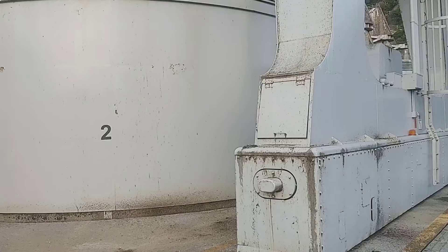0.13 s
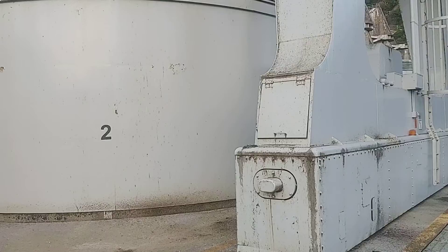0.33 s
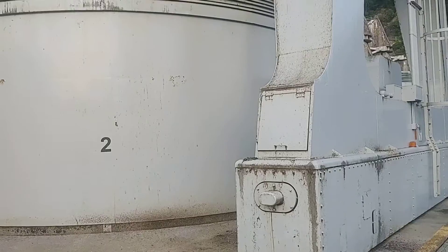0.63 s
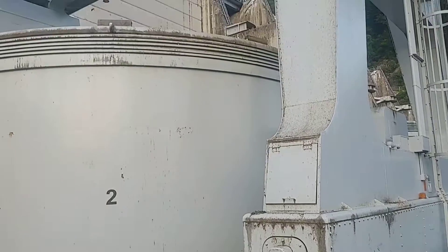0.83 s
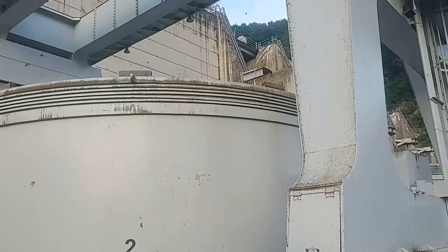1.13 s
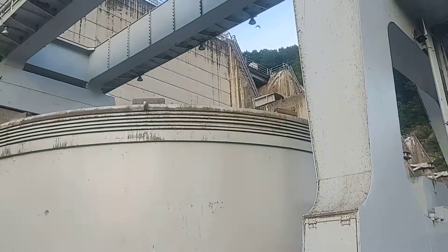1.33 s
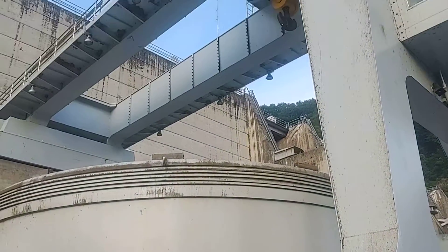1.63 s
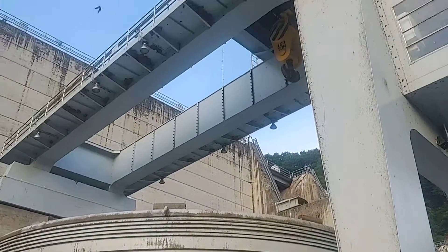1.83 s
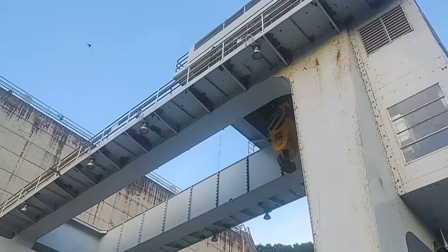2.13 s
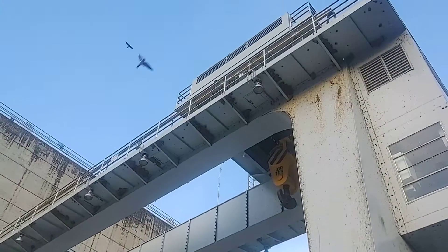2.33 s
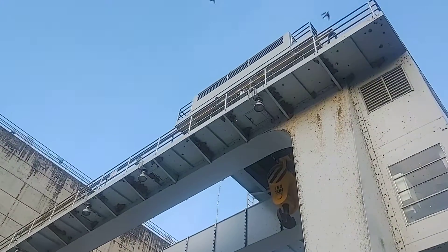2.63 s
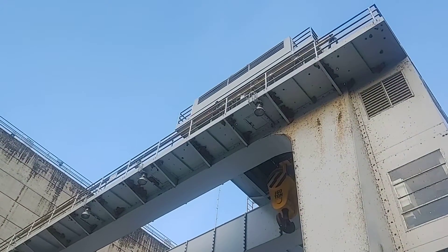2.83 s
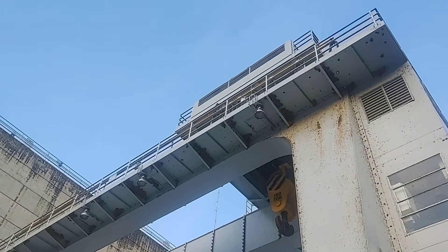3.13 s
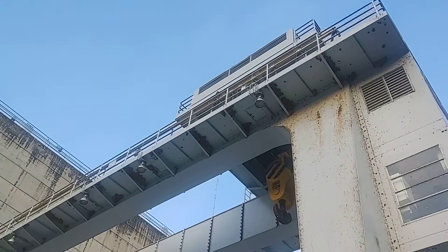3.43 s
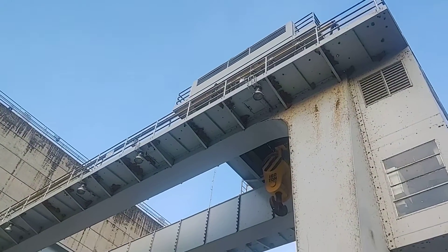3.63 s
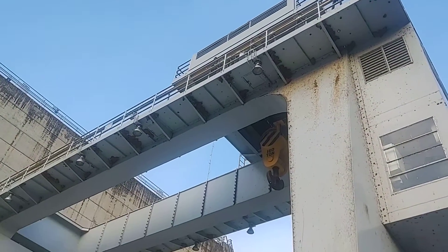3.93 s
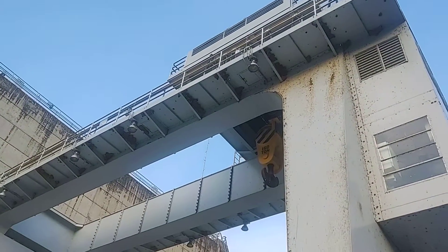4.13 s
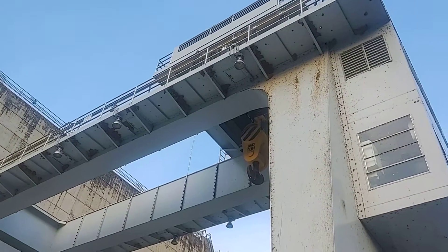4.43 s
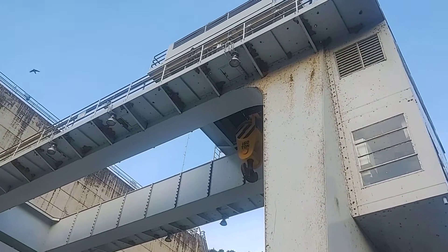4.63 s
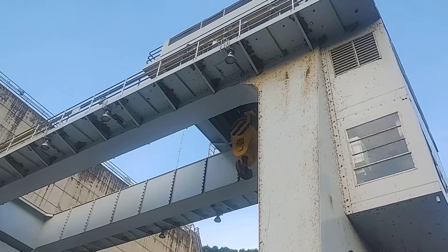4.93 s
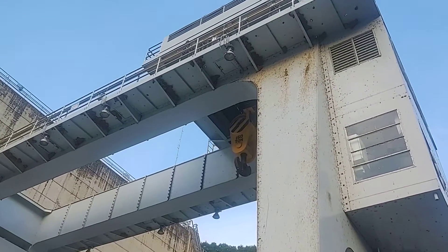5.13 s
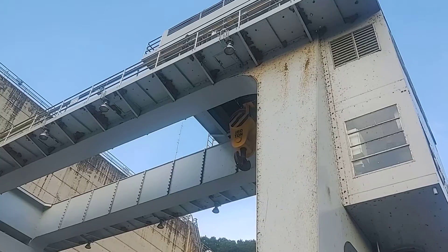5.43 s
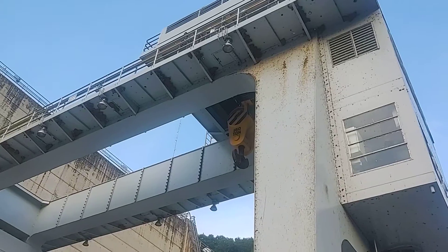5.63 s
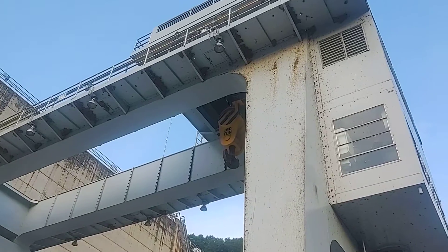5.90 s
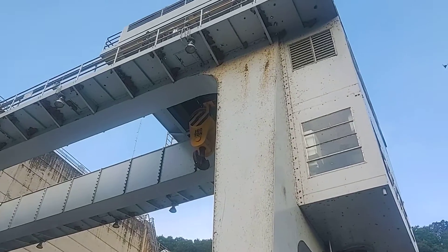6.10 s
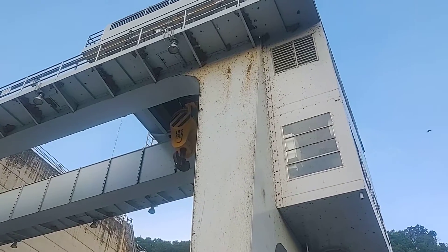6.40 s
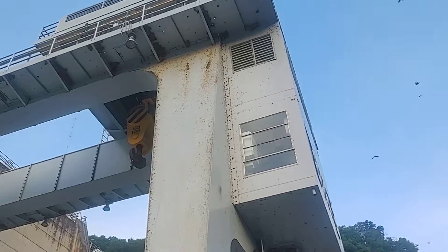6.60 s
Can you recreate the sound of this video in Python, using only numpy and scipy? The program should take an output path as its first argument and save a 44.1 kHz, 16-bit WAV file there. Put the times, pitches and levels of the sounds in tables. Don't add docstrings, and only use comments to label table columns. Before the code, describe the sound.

The first 0.3 seconds are silent; then sound snaps open, swells too loud with a boxy boom, and settles by about 1 second. A deep steady generator hum, slightly pulsing, continues to the end with muffled fan and water wash and a faint mid-high whine strongest around 2.5 seconds. From 0.3 to 1.3 seconds small birds call densely: a loud tumbling chirp, hoarse descending churrs, chips and thin whistles. More chips and rasps cluster at 1.5-2 and 2.4-2.9 seconds, ending in a soft pair. From 3 to 4 seconds only faint distant chips. A loud raspy pair comes at 4.15 left, two buzzy rapid twitters at 4.8 and 5.0, a churr at 5.4 with a tiny stumble, a left pair at 5.6, and bright squeaky calls at 6.1-6.3 and 6.6. Short hard-surface echoes surround the calls.

```python
import sys
import numpy as np
from scipy import signal
from scipy.fft import rfft, irfft
from scipy.io import wavfile

SR = 44100
rng = np.random.default_rng(int(sys.argv[2]) if len(sys.argv) > 2 else 0)


def bounce(signal):
    frames = np.transpose(np.atleast_2d(signal))
    limited = np.clip(frames, -1, 1)
    pcm = np.round(limited * 32767).astype(np.int16)
    wavfile.write(sys.argv[1], SR, pcm)


def rack_gain(trim_db):
    fader = np.asarray(trim_db, float)
    return 10 ** (fader / 20)


N = 298116
T = np.arange(N) / SR
SIDES = np.array([[.5], [-.5]])

# frequency in Hz, level in dB, left minus right in dB.
THROAT = [(1300, -25, 0), (2400, -2, 0), (3500, -1, 0), (4500, 1, 2), (5400, -6, 0), (7200, -21, -5),
          (9000, -19, -7), (11500, -24, -9), (16000, -30, -9)]


def curve(table, at=T, col=1):
    rows = np.array(table)
    return np.interp(at, rows[:, 0], rows[:, col])


def shaped(size, gain_at):
    hz = np.arange(size // 2 + 1) * SR / size
    x = irfft(rfft(rng.standard_normal(size)) * gain_at(hz), size)
    return x / np.std(x)


def walk(size, rate_hz):
    return shaped(size, lambda hz: (hz > 0) * np.exp(-(hz / rate_hz) ** 2))


def span(length_s):
    return np.linspace(0, 1, int(length_s * SR))


def add(out, s, sound, db, pan_db):
    i = int(s * SR)
    n = min(sound.shape[-1], N - i)
    placed = sound * rack_gain(db + SIDES * pan_db)
    out[:, i:i + n] += placed[:, :n]


def voice(hz, count, rough, flutter_db, top_db=0, order=3, lean_db=0):
    hz = hz * (1 + rough * walk(len(hz), 520))
    phase = 2 * np.pi * np.cumsum(hz) / SR
    out = 0
    for k in range(1, count + 1):
        db = curve(THROAT, k * hz) + SIDES * curve(THROAT, k * hz, col=2)
        db = db + top_db * (k > order) + lean_db * (k == order)
        db = db + flutter_db * np.clip(walk(len(hz), 250), -3, 1.5)
        audible = k * hz < .36 * SR
        out = out + np.sqrt(2) * rack_gain(db) * np.sin(k * phase) * audible
    return out


def churrs(out):
    # start in seconds, length in seconds, top pitch in Hz, level in dB, upper overtones in dB.
    slurs = [
        (0.294, 0.13, 1732, -60.5, 3.5),
        (.48, 0.073, 1630, -79.5, 14),
        (0.624, 0.17, 1725, -61.5, -9),
        (1.119, 0.15, 1740, -61, -9),
        (1.82, 0.11, 1650, -66, -4),
        (2.53, 0.089, 1657, -62.5, -6),
        (2.804, .07, 1864, -68, -6),
        (5.416, .175, 1752, -62, -3),
        (6.053, 0.17, 1770, -71, 7),
        (6.6, 0.17, 1717, -72, 3),
    ]
    slide_hz_per_s = 3500
    for s, length, top_hz, db, top_db in slurs:
        p = span(length)
        slide = np.clip((p - .2) / .8, 0, 1) ** 1.2
        scoop_hz = 250 * np.exp(-p / .07)
        hz = top_hz - slide_hz_per_s * length * slide - scoop_hz
        sound = voice(hz, count=8, rough=.008 + .017 * p, flutter_db=4.5,
                      top_db=top_db + 10 - 23 * p, lean_db=.6 * top_db)
        add(out, s, sound * np.sin(np.pi * p ** 1.25) ** .55, db, 2)


def chip(out, s, length, mid_hz, db, pan_db, hz_per_s=0):
    p = span(length)
    arch_hz = 480 * min(1, .06 / length) ** 3 * (np.sin(np.pi * p) - .6)
    hz = mid_hz + hz_per_s * length * (p - .5) + arch_hz
    sound = voice(hz, count=3, rough=.02, flutter_db=3, top_db=-8, order=1)
    add(out, s, sound * np.sin(np.pi * p) ** .6, db + 3.5, pan_db)


def chips(out):
    # start in seconds, length in seconds, pitch in Hz, level in dB,
    # left minus right in dB.
    near = [(.575, 0.029, 3780, -67, 4), (.637, 0.022, 3850, -63, -1), (1.018, 0.028, 3810, -65, -6),
            (1.045, 0.022, 3200, -61, 1), (1.062, 0.031, 3900, -59, 0), (1.575, 0.036, 3600, -61.5, 0),
            (1.648, 0.032, 3780, -65, 0), (1.803, 0.03, 3750, -59, 4), (1.822, .025, 3450, -59, 4),
            (1.83, .022, 3850, -63, 2), (2.388, .026, 3750, -65.5, 0), (5.565, 0.019, 3040, -61, 6)]
    # start in seconds, length in seconds, middle pitch in Hz, level in dB,
    # left minus right in dB.
    falls = [
        (.325, 0.1, 4630, -56.5, -1),
        (.7, 0.079, 4410, -66, -3),
        (1.82, 0.039, 3540, -63, 2),
        (1.845, 0.055, 4550, -67, 0),
        (2.18, .03, 3720, -72, 0),
        (2.41, .045, 3400, -70, 0),
        (2.65, .03, 3800, -74, -2),
    ]
    # start in seconds, pitch in Hz, level in dB.
    far = [(1.103, 3890, -68), (1.327, 3400, -69), (1.358, 3780, -65), (1.497, 3140, -68),
           (1.518, 3700, -68), (1.538, 3550, -67), (1.618, 3850, -74), (1.71, 3860, -64.5),
           (1.745, 3500, -64), (2.21, 3750, -65), (2.24, 3820, -70), (2.365, 4500, -73), (1.39, 3800, -71),
           (2.595, 3950, -71), (3.665, 3750, -73), (3.914, 3950, -69), (4.208, 5050, -69)]
    # start in seconds, gap in seconds, pitch in Hz, level in dB,
    # left minus right in dB.
    doubles = [
        (2.947, 0.035, 4085, -64.5, 5),
        (4.155, 0.035, 4160, -58, 8.5),
        (5.578, .033, 4210, -58.5, 12.5),
        (6.265, 0.028, 4230, -60, 4),
    ]
    brief_s, rise_hz_per_s, fall_hz_per_s = 0.0243, 4300, 11500
    for row in near:
        chip(out, *row)
    for row in falls:
        chip(out, *row, hz_per_s=-fall_hz_per_s)
    for s, hz, db in far:
        chip(out, s, brief_s, hz, db, 0, rise_hz_per_s)
    for s, gap, hz, db, pan_db in doubles:
        chip(out, s, brief_s, hz, db, pan_db, rise_hz_per_s)
        chip(out, s + gap, brief_s, hz, db - 2, pan_db, rise_hz_per_s)


def strokes(out):
    # start in seconds, length in seconds, first pitch in Hz, last pitch in Hz, level in dB.
    glides = [(.628, .03, 3030, 3420, -59), (.666, .03, 5120, 4950, -64), (.795, 0.029, 3900, 4330, -58.5),
              (.815, .043, 4370, 3820, -54), (.852, .028, 2980, 3130, -59), (.874, .04, 3130, 2950, -63),
              (1.124, .033, 3130, 3520, -65), (1.158, 0.06, 5250, 4800, -61),
              (1.212, .045, 2900, 2560, -59), (1.22, 0.052, 3970, 3850, -56),
              (1.266, .045, 3900, 3780, -52), (1.263, .028, 3480, 3030, -56),
              (1.288, .018, 3080, 3420, -58), (1.308, .028, 3330, 3080, -59), (1.848, .05, 3100, 2750, -61),
              (2.506, 0.039, 3370, 3340, -62), (2.556, .032, 3800, 2980, -62),
              (2.562, .05, 4750, 4000, -67), (2.817, 0.034, 3760, 3480, -66),
              (6.07, .045, 3330, 3500, -61.5), (6.108, .05, 3480, 2950, -63), (6.632, .03, 3420, 3300, -66),
              (6.663, .08, 3320, 2820, -63), (6.655, .088, 4950, 4550, -67),
              (6.615, .052, 9900, 10250, -58), (6.625, .04, 8400, 8450, -60), (5.52, .055, 2850, 2420, -65),
              (6.088, .035, 5300, 5130, -61), (6.13, .06, 4750, 4050, -66), (6.125, .045, 3450, 3380, -63),
              (6.262, .018, 5350, 6120, -51), (6.281, .022, 5380, 5680, -52), (6.299, .02, 5850, 6270, -54),
              (6.304, .02, 5400, 5600, -62), (6.266, .024, 8300, 9050, -54), (6.297, .027, 8000, 8900, -56)]
    for s, length, first_hz, last_hz, db in glides:
        p = span(length)
        hz = first_hz + (last_hz - first_hz) * np.sin(np.pi * p / 2) ** 1.3
        sound = voice(hz, count=2, rough=.014, flutter_db=2.2, top_db=-3, order=1)
        add(out, s, sound * np.sin(np.pi * p) ** 0.31, db, 2)


def twitters(out):
    # start in seconds, length in seconds, low voice in Hz, high voice crest in Hz, level in dB.
    songs = [
        (4.794, .108, 2720, 5450, -54),
        (4.972, .1, 2720, 5450, -56.5),
    ]
    # crest in seconds, height in Hz, accent in dB.
    flicks = [
        (4.823, 520, 8),
        (4.852, 850, 7),
        (4.884, 760, 8),
        (5.0, 500, 9),
        (5.028, 650, 7),
        (5.059, 600, 9),
    ]
    # multiple of low voice, multiple of high voice, level in dB.
    blend = [(1, 0, 1), (2, 0, 0), (3, 0, 7), (4, 0, -1), (5, 0, 1), (0, 1, -7), (0, 2, 4), (1, 1, 4),
             (-1, 2, 6), (2, 1, -4), (1, 2, -1), (-1, 3, -3)]
    flick_rise_s, flick_drop_s = .009, .004
    scoop_share, scoop_s, sag_share = .27, .015, .19
    for s, length, low_hz, high_hz, db in songs:
        p = span(length)
        t = s + p * length
        bumps = []
        for crest_s, _, _ in flicks:
            width_s = np.where(t < crest_s, flick_rise_s, flick_drop_s)
            bumps.append(np.exp(-((t - crest_s) / width_s) ** 2))
        onset = np.exp(-(t - s) / scoop_s)
        scoop = 1 - scoop_share * onset
        flicked_hz = low_hz + sum(row[1] * b for row, b in zip(flicks, bumps))
        low = scoop * flicked_hz * (1 + .015 * walk(len(p), 200))
        high = scoop * high_hz * (1 - sag_share * p ** 2.2) * (1 + .02 * walk(len(p), 200))
        accent_db = sum(row[2] * b for row, b in zip(flicks, bumps)) - 6
        for m, n, tone_db in blend:
            m, n = round(m), round(n)
            tone = voice(m * low + n * high, count=1, rough=.008, flutter_db=6 - 3.5 * (n == 0))
            swell_db = accent_db * (m > 0) - 14 * (m + n == 1) * onset
            pan_db = 2.5 if m + n == 1 and n < 2 else -2
            add(out, s, tone * rack_gain(swell_db) * np.sin(np.pi * p) ** .3, db + tone_db, pan_db)


def rasp(out, share, s, length, mid_hz, db, pan_db=None):
    p = span(length)
    resonance = lambda hz: np.exp(-2 * ((hz / mid_hz - 1) / share) ** 2)
    air = np.array([shaped(len(p), resonance) for _ in range(2)])
    slap_hz = 70 * (1 + .5 * walk(len(p), 40))
    slap = 1 + .45 * np.sin(2 * np.pi * np.cumsum(slap_hz) / SR)
    if pan_db is None:
        pan_db = curve(THROAT, mid_hz, col=2)
    add(out, s, air * slap * np.sin(np.pi * p) ** .45, db, pan_db)


def rasps(out):
    # start in seconds, length in seconds, centre in Hz, level in dB,
    # left minus right in dB.
    hoarse = [(.36, .091, 4700, -63, 0), (0.75, .12, 4550, -64, -2), (1.218, 0.15, 3600, -60, 0),
              (1.789, 0.148, 4550, -61.5, 4), (2.169, 0.091, 3400, -69, -3), (2.559, 0.13, 3600, -64.5, 2),
              (4.121, 0.25, 4500, -66, 7), (4.198, .15, 2600, -59.5, 3), (4.19, .13, 5900, -71, -3),
              (5.548, 0.069, 4400, -65, 0), (5.572, 0.076, 3800, -61, 7), (6.66, 0.097, 5300, -70, 0),
              (4.86, .05, 4400, -69, 0), (1.782, .095, 3400, -60, 2), (1.7, .045, 3200, -67, 2),
              (6.24, .09, 5300, -62, 6), (1.3, .12, 3700, -65, 0), (.79, .11, 3800, -66, 2)]
    # start in seconds, length in seconds, centre in Hz, level in dB.
    gusts = [(0.536, 0.1, 6800, -66.5), (1.09, .11, 7800, -71), (1.792, 0.077, 9500, -73.5),
             (1.968, .08, 6500, -77.5), (2.55, .1, 9000, -83), (2.92, .094, 10000, -80),
             (4.502, 0.053, 5870, -71), (4.68, .045, 5940, -73), (4.799, .082, 10500, -76),
             (4.978, .073, 10500, -77), (6.217, 0.1, 6560, -69), (6.658, .006, 9000, -77)]
    # start in seconds, length in seconds, centre in Hz, level in dB.
    hisses = [(.33, .094, 10800, -80), (.565, .047, 11500, -73), (.78, 0.075, 12300, -82),
              (1.01, 0.077, 11500, -75.5), (1.201, 0.084, 11600, -75), (1.34, .055, 11300, -80),
              (1.64, .05, 11500, -81), (1.95, .04, 12000, -83), (2.18, .04, 11200, -83),
              (2.39, .025, 11500, -84), (4.12, .2, 9050, -81), (4.195, .14, 12600, -79),
              (5.46, 0.15, 10800, -80.5), (6.11, .079, 11500, -82), (6.228, 0.089, 13800, -76),
              (6.615, 0.078, 10200, -84)]
    for share, table in ((0.43, hoarse), (0.61, gusts), (0.17, hisses)):
        for row in table:
            rasp(out, share, *row)


def squeaks(out):
    # start in seconds, length in seconds, first pitch in Hz, last pitch in Hz, level in dB.
    lines = [(.68, .12, 9800, 11100, -82), (.79, .22, 11150, 11200, -84), (.495, 0.035, 6440, 6000, -77),
             (1.1, .12, 11000, 11350, -89), (1.16, 0.11, 6730, 5020, -71), (1.3, .15, 11550, 11650, -90),
             (1.31, .07, 15750, 14500, -92), (1.38, .07, 14450, 14850, -92),
             (3.575, .055, 11700, 10300, -83), (4.39, .2, 9450, 9650, -91), (4.42, .15, 14800, 15450, -93),
             (4.9, .08, 9250, 9350, -87), (6.51, .05, 6950, 6600, -77), (6.57, 0.11, 6600, 6530, -75),
             (6.625, .04, 15000, 15400, -86)]
    for s, length, first_hz, last_hz, db in lines:
        p = span(length)
        hz = first_hz + (last_hz - first_hz) * p + 40 * walk(len(p), 30)
        line = np.sin(2 * np.pi * np.cumsum(hz) / SR) * rack_gain(3.6 * walk(len(p), 50))
        add(out, s, line * np.sin(np.pi * p) ** 0.28, db, 7)


def walls(dry, t60, wet_db):
    t = T[:SR // 2]
    tail = rng.standard_normal((2, len(t))) * rack_gain(-60 * t / t60) * (1 - np.exp(-t / 0.0075))
    tail /= np.sqrt(np.sum(tail ** 2, axis=1, keepdims=True))
    return dry + rack_gain(wet_db) * signal.fftconvolve(dry, tail, axes=1)[:, :N]


def generator():
    # multiple of the pole frequency, level in dB, left minus right in dB, left lead in radians.
    hum = [(2, -66.5, -0.5, 0.5), (4, -62.5, -0.5, 0.5), (6, -57, -1, 0.13), (9, -66.5, 4, 1.1),
           (12, -62, 0, 0.6), (15, -65.5, -3, 0), (18, -68.5, -8.5, 0), (21, -73.5, -1, 0.5),
           (33, -63.5, -5, 2.5), (36, -71, -6, -1), (42, -82, -4, 2)]
    # offset from the hum in Hz, level under it in dB, first cancelling moment in seconds.
    slips = [
        (-2.01, -16.6, .052),
        (1.68, -21.4, .547),
        (-3.83, -22.8, .16),
        (-3.32, -22.3, .193),
        (-6.68, -29, .077),
    ]
    # time in seconds, level in dB.
    whine = [(1, -69), (2.2, -72), (2.5, -64.5), (3.3, -67.5), (4.2, -74), (4.6, -74), (6.76, -78)]
    pole_hz, whine_hz = 39.997, 2014.9
    main_db, motors_db = -44.5, -1
    phase = 2 * np.pi * 3 * pole_hz * T
    motors = 0
    for off_hz, db, s in slips:
        motors = motors + rack_gain(db + motors_db) * np.sin(phase + 2 * np.pi * off_hz * (T - s))
    out = rack_gain(main_db - 0.21 * SIDES) * (np.sin(phase) - motors)
    out += rack_gain(curve(whine)) * np.sin(2 * np.pi * whine_hz * T + 0.5 * SIDES)
    for k, db, pan_db, lead in hum:
        level_db = db + 0.84 * walk(N, 2.6) + SIDES * pan_db
        cycles = round(k) * pole_hz * T + rng.random()
        out += rack_gain(level_db) * np.sin(2 * np.pi * cycles + lead * SIDES)
    return np.sqrt(2) * out


def wash():
    # frequency in Hz, level in dB per Hz.
    spectrum = [(25, -28), (50, -20), (78, 1.5), (150, -2.5), (290, -4.5), (400, -8.5), (750, -8.5),
                (1600, -15.5), (2200, -17), (3200, -24), (4400, -26.5), (7500, -43.5), (11500, -48),
                (16000, -54)]
    # frequency in Hz, side minus mid in dB.
    side_levels = [(60, -19), (110, -17), (200, -13), (380, -11), (700, -5.5), (1290, -0.5), (2380, -0.5),
                   (4400, -0.5), (8120, 0), (15000, 0.5)]
    # frequency in Hz, left minus right in dB.
    pan_levels = [(60, -3.5), (110, -1.5), (200, -3), (380, 2), (700, 0), (1290, -3.5), (2380, 2.5),
                  (4400, 3.5), (8120, -4), (15000, -5.5)]
    # time in seconds, level of the upper wash in dB.
    tilt = [(1, 2), (1.6, 0.5), (2.2, 0), (3, -0.5), (4, -.5), (5, 0), (6, -1.5), (6.76, -1)]
    hz = np.maximum(np.arange(N // 2 + 1) * SR / N, 1)

    def along(table):
        rows = np.array(table)
        return np.interp(np.log(hz), np.log(rows[:, 0]), rows[:, 1])

    mid, side = rfft(rng.standard_normal((2, N)))
    ports = mid + 2 * SIDES * side * rack_gain(along(side_levels))
    both = rack_gain(along(spectrum) + SIDES * along(pan_levels)) * ports
    upper = 1 / (1 + (900 / hz) ** 4)
    low, high = irfft(both * (1 - upper), N), irfft(both * upper, N)
    mix = low * rack_gain(0.24 * walk(N, 5.5)) + high * rack_gain(curve(tilt) + 0.55 * walk(N, 4.3))
    return rack_gain(-50.5) * mix / np.std(low + high)


def casings():
    # resonance in Hz, width in Hz, level in dB.
    rings = [
        (288, 16, -69.5),
        (1367, 107, -69),
        (2025, 290, -69),
        (2168, 30, -76.5),
    ]
    # time in seconds, level in dB.
    shelter = [(.3, -57.5), (.6, -51.5), (1.05, -56), (1.5, -64), (2, -75)]

    def bell(mid_hz, width_hz):
        return shaped(N, lambda hz: 1 / (1 + (2 * (hz - mid_hz) / width_hz) ** 2))

    out = np.tile(rack_gain(curve(shelter)) * bell(254, 210), (2, 1))
    for mid_hz, width_hz, db in rings:
        spread = min(mid_hz / 1300, 1)
        ring = bell(mid_hz, width_hz) + 2 * SIDES * spread * bell(mid_hz, width_hz)
        out += rack_gain(db + 1.3 * walk(N, 1.7)) * ring
    return out


def scene():
    birds = np.zeros((2, N))
    for calls in (churrs, chips, strokes, twitters, rasps, squeaks):
        calls(birds)
    port_lag_s = -.00006
    birds[1] = np.roll(birds[1], round(port_lag_s * SR))
    birds = rack_gain(-0.5) * walls(birds, t60=.02, wet_db=-9)
    return walls(birds, t60=.3, wet_db=-10) + generator() + wash() + casings()


def gain_control():
    start_s, open_s, open_db_per_s = .283, .291, 6000
    open_db, climb_s, peak_db = -19, 0.082, 8
    settle_s, settle_len_s, settle_db = 0.91, 0.071, -5.5
    since = T - open_s
    climb_db = peak_db + open_db * np.exp(-np.maximum(since, 0) / climb_s)
    climb_db = climb_db + open_db_per_s * np.minimum(since, 0)
    settled = (1 + np.tanh((T - settle_s) / settle_len_s / 2)) / 2
    return rack_gain(climb_db + settle_db * settled) * (T > start_s)


def band_limit(x):
    return signal.sosfilt(signal.butter(12, 15860, fs=SR, output="sos"), x)


def record(dry):
    stumble_s, stumble_len_s, blend_s = 5.4225, .00195, 0.00049
    blend = np.clip((T - stumble_s) / blend_s, 0, 1)
    late = np.roll(dry, int(stumble_len_s * SR), axis=1)
    mix = dry * (1 - blend) + late * blend
    return band_limit(mix * gain_control())


dry = scene()
out = record(dry)
bounce(out)
```